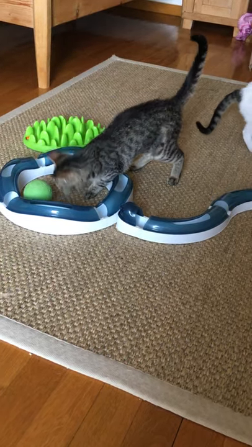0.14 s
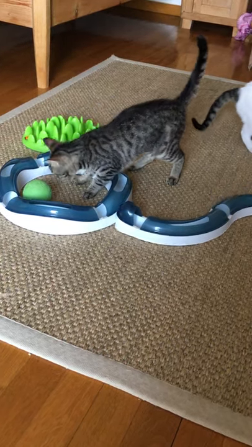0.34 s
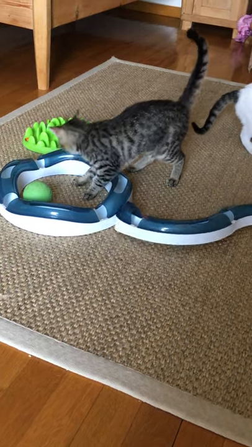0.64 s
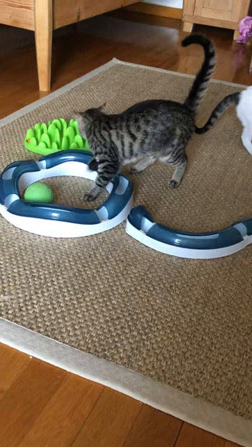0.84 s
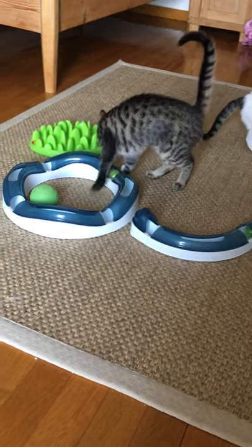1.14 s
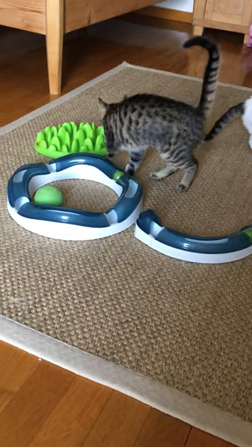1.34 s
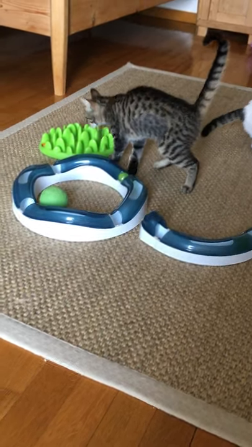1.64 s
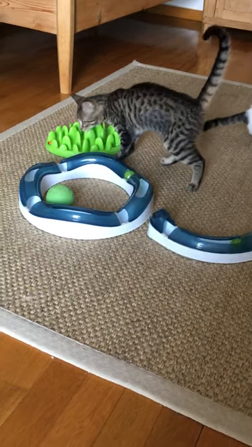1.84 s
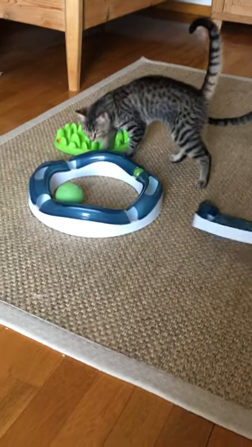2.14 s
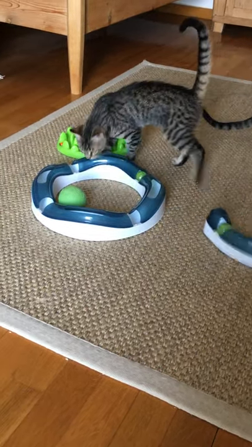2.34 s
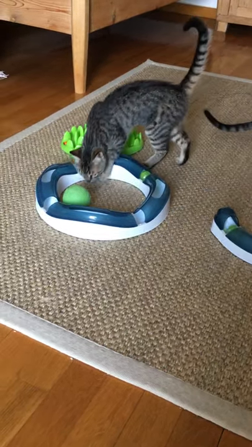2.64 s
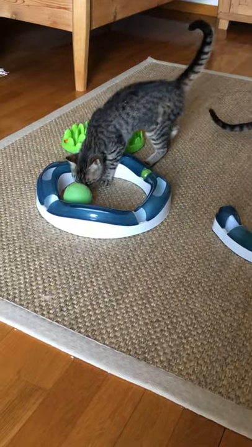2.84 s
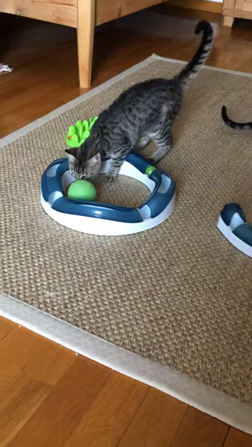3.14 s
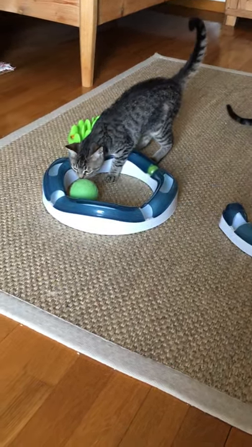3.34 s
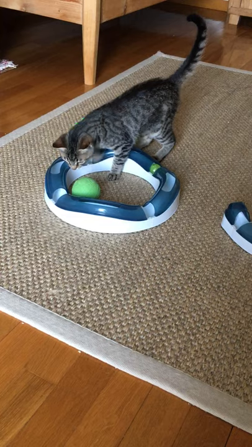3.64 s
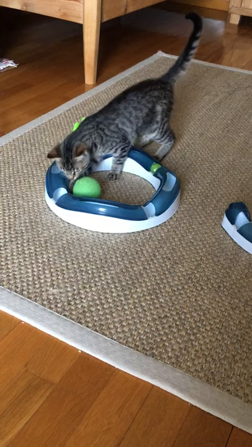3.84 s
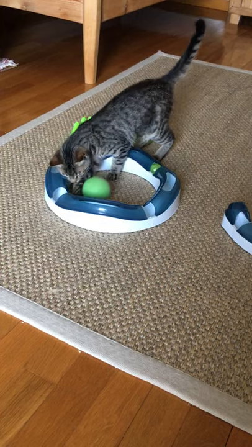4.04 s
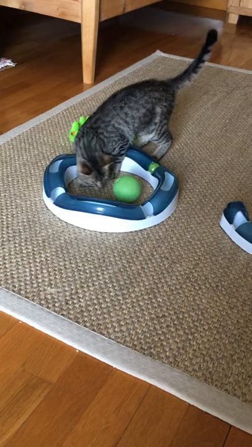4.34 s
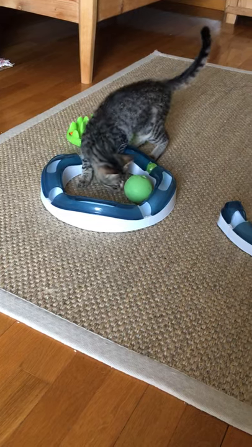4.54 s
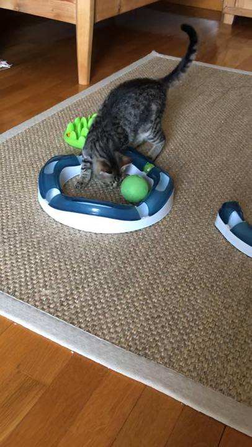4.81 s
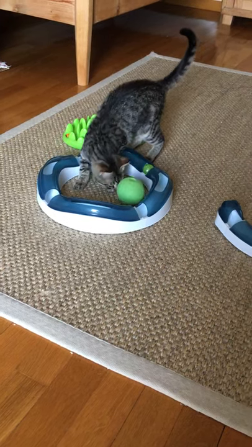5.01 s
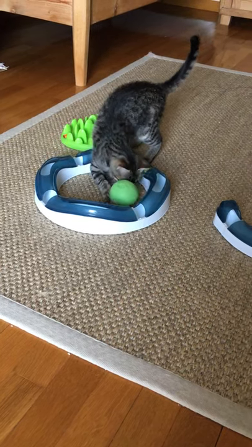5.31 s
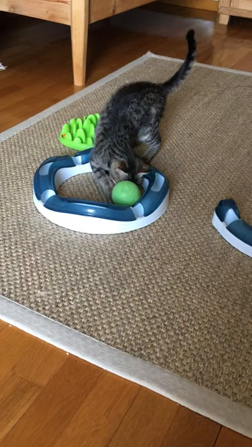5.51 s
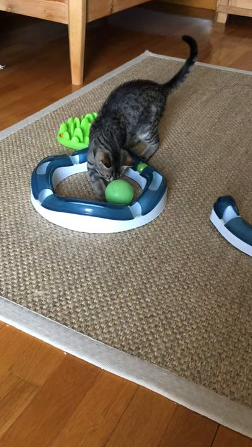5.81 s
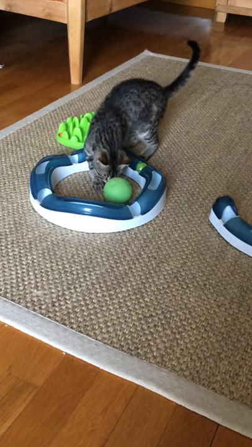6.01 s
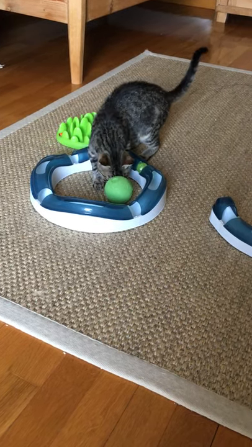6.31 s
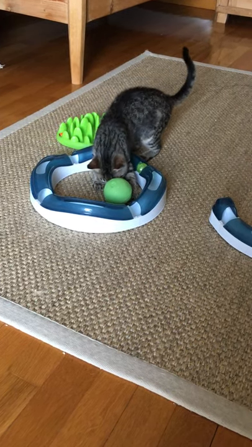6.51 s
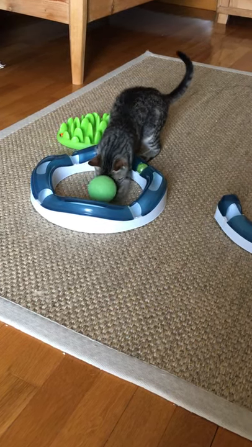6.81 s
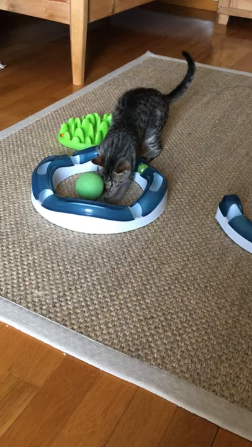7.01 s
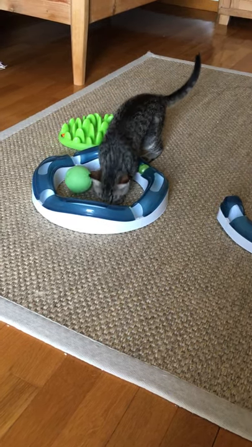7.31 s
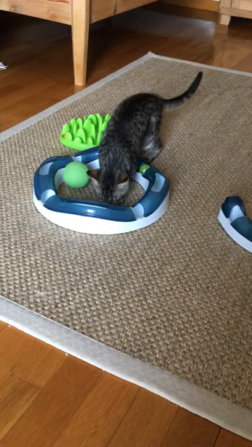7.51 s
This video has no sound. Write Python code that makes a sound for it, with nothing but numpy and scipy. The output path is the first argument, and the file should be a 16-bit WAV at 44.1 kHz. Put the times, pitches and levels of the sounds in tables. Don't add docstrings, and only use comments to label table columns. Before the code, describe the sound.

Thin plastic shells clack and dull hollow bases thud as paws strike toy tracks. Scraping and brushing over rug fibres accompany the early blows, including a strong crack near one second and the loudest clattering impact near two and a half. Faint taps follow, then a big hollow ball rolls softly and busy lighter knocks continue to the end, with short indoor reverberation and low hum.

```python
import sys
import numpy as np
from scipy import signal
from scipy.fft import rfft, irfft, next_fast_len
from scipy.io import wavfile
from scipy.ndimage import uniform_filter1d

SR = 44100
rng = np.random.default_rng(int(sys.argv[2]) if len(sys.argv) > 2 else 0)


def wav_out(sig):
    wavfile.write(sys.argv[1], SR, np.round(np.clip(np.atleast_2d(sig).T, -1, 1) * 32767).astype(np.int16))


def invert_db(level):
    return 10 ** (np.asarray(level, dtype=float) / 20)


N = 337785

# (frequency [Hz], density [dB per Hz])
HUM_COLOUR = [(15, -25), (25, -15), (64, 3.5), (97, 3.5), (206, -7.5), (335, -7.5), (439, -24.5),
              (677, -10), (936, -19), (1480, -19), (3430, -31.5), (12200, -35.5), (16000, -44)]
# (time [s], held [s], ball in track [dB], harshness as scrape re ball [dB])
SLIDES = [(0, 0.17, -55, -3.5), (.25, 0.17, -60.5, -0.5), (.53, 0.33, -61.5, 0.5), (.8, 0.13, -61.5, 3.5),
          (0.898, 0.058, -43.5, -7), (1.29, 0.017, -72.5, 10), (1.61, 0.16, -59.5, -1),
          (1.75, 0.024, -55, 8.5), (1.86, .22, -59, 1), (2.13, 0.056, -43, -3.5), (2.3, 0.35, -58, -1),
          (2.68, 0.055, -55, -5.5), (2.76, 0.031, -66.5, 4.5), (2.848, .75, -71, -16),
          (3.65, .6, -81.5, -2), (5.07, 0.16, -63, 1), (5.289, 0.14, -61, -17), (5.46, 0.11, -62.5, -2),
          (5.621, 0.028, -46, 0), (5.73, .11, -56.5, -9.5), (6.079, 0.06, -60, 4), (6.2, 0.021, -47, -11.5),
          (6.28, 0.064, -53, -7), (6.52, 0.026, -49.5, 8.5), (6.59, 0.031, -52.5, 7.5),
          (6.7, 0.086, -52.5, 5), (6.79, 0.039, -57, -23), (6.9, 0.3, -58, -9), (7.37, 0.028, -63, 1),
          (7.47, .2, -67.5, -6)]
# (frequency [Hz], width [Hz], level [dB])
TRACK_MODES = [(1150, 33, -1), (1350, 550, 19), (1650, 220, 16), (2000, 520, -13)]
# (frequency [Hz], density [dB per Hz])
SCRAPE_COLOUR = [(1800, -7), (2500, 1.5), (3200, -2), (4300, -8.5), (5500, -16)]
# (frequency [Hz], density [dB per Hz])
FIBRE_COLOUR = [(4500, -9.5), (6000, 4), (8000, -7.5), (12000, -7.5), (16000, -15)]
# (time [s], held [s], level [dB])
SHOVES = [(0, .04, -58.5), (.12, .75, -69), (.97, 0.15, -65), (1.521, .55, -63.5), (2.28, 0.32, -56.5),
          (2.5, 0.028, -43), (2.8, .7, -71.5), (4.618, 0.096, -62.5), (5.64, 0.18, -54),
          (6.15, 0.19, -56.5), (6.58, 0.62, -58.5), (6.97, 0.14, -57.5), (7.17, 0.31, -70.5),
          (7.62, .05, -62.5)]
# (frequency [Hz], width [Hz], level [dB])
BASE_MODES = [(151.6, 97, 6.5), (244, 36, 6), (350.5, 110, -11.5), (510, 88, -5.5), (694, 930, -4)]
# (delay [s], level [dB])
ECHOES = [
    (.009, -20),
    (.015, -11),
    (.026, -13.5),
    (.035, -10),
]
# (frequency [Hz], T60 [s], level [dB])
ROOM_TAIL = [(124.3, 0.053, -13), (370, 0.36, 11), (1000, 0.42, 2), (2170, 0.44, 4.5), (4300, 0.36, 3.5),
             (9300, 0.27, 4.5), (13050, 0.21, 0.5)]
# (time [s], wall ring [dB], ring pitch [Hz], weight as thud re ring [dB], hardness as clack re ring [dB])
BATS = [(0.04, -41.5, 1510, -14.5, -7.5), (0.116, -30.5, 1600, -25, -14.5), (0.272, -39, 1350, -17, -17),
        (0.359, -39, 1560, -16, -16), (0.48, -40, 1410, -15.5, -11.5), (0.89, -13.5, 1196, -22.5, -19),
        (1.287, -46, 1615, -45, -13), (1.567, -45.5, 1380, -31, -17), (1.622, -25.5, 1080, -17.5, -23.5),
        (1.649, -23.5, 1446, -15.5, -20.5), (1.696, -34.5, 1530, -11, 5.5), (1.708, -21.5, 1040, -22, -34),
        (1.795, -40.5, 1080, -11.5, -6), (1.833, -28.5, 1600, -40, -13), (1.889, -49, 1560, -32, -1.5),
        (1.943, -37, 1560, -37, -16), (2, -52.5, 1350, -19, 0), (2.102, -36.5, 1380, -10.5, -0.5),
        (2.169, -31.5, 1300, -43, -18), (2.297, -33, 1280, -13.5, -22.5), (2.589, -30, 1640, -30, -9),
        (2.749, -31, 1350, -19, -14)]
# (time [s], wall ring [dB], ring pitch [Hz])
TAPS = [(0.164, -65, 1560), (2.989, -50.5, 1255), (3.128, -53.5, 1148), (3.314, -53.5, 1264),
        (3.449, -53.5, 1460), (3.524, -56.5, 1280), (3.619, -57, 1940), (3.65, -49, 1530),
        (3.825, -56.5, 1226), (3.991, -51, 1126), (4.163, -61.5, 1376), (4.513, -58.5, 969),
        (4.582, -48.5, 1290), (4.78, -56.5, 934), (4.907, -53.5, 1214), (5.262, -55.5, 1550),
        (7.216, -55, 1520), (7.492, -61.5, 1350), (7.522, -54, 1960), (7.585, -50, 1330),
        (7.612, -42, 1370)]
# (time [s], level [dB], pitch [Hz])
PAWS = [
    (0.428, -58, 99),
    (0.63, -56, 210),
    (0.668, -56.5, 124),
    (1.66, -51, 310),
    (2.302, -49.5, 335),
    (2.344, -65, 333),
    (7.057, -47, 240),
    (7.615, -53, 200),
    (5.292, -46, 69),
    (5.979, -54.5, 267),
]
# (time [s], wall ring [dB], ring pitch [Hz], weight [dB], hardness [dB])
CRASH = [
    (2.43, -25, 1150, -6.5, -28.5),
    (2.441, -13.5, 1215, -38, -21.5),
    (2.443, -4, 1240, -19, -30.5),
    (2.45, -8, 1394, -36, -9),
    (2.453, -11, 1750, -10.5, -21),
    (2.46, -13.5, 2060, -44.5, -19),
]
# (time [s], wall ring [dB], ring pitch [Hz], weight [dB], hardness [dB])
SWATS = [(5.032, -32, 1720, -38.5, -1.5), (5.197, -48.5, 1140, -7, -6.5), (5.452, -49, 1450, -11.5, 1),
         (5.462, -32.5, 1550, -21.5, -2), (5.487, -44, 1420, -32, -2), (5.557, -37.5, 1460, -29, -8.5),
         (5.607, -35.5, 1320, -17, 2.5), (5.701, -36, 1150, -12, -23), (5.764, -34.5, 1350, -29, -5.5),
         (5.788, -26, 1440, -15.5, -23.5), (6.067, -26.5, 1340, -20, -7.5), (6.08, -29, 1505, -9, -47),
         (6.209, -32.5, 1570, -11.5, -19), (6.288, -23.5, 1280, -23, -13.5), (6.348, -40.5, 2070, -16, 7.5),
         (6.465, -35.5, 1600, -26, -9.5), (6.636, -34, 1800, -15, -5.5), (6.776, -27, 1360, -16.5, -9),
         (6.971, -41, 1602, -31, -12), (7.055, -36.5, 1440, -5, -26), (7.12, -36.5, 1140, -10.5, -16.5),
         (7.269, -38.5, 1380, -35, -7), (7.304, -45, 1340, -7.5, -7.5), (7.353, -39.5, 1195, -12.5, -11)]
# (frequency [Hz], T60 [s], level [dB])
THUD_MODES = [(124, 0.07, -6), (175.7, 0.054, -5.5), (245, 0.041, -0.5), (329, 0.024, 1.5),
              (442.7, 0.044, -5), (610, 0.016, 9), (825, 0.036, 4)]
# (contact tick [dB], loss of lowest base modes [dB per dB of softer blow])
FAR_TRACK = (-6, 0.19)
NEAR_TRACK = (-3.7, 0.1)
# (time [s], held [s], level [dB], share of its deepest mode [dB])
NUDGES = [
    (4.18, .09, -63.5, -12),
    (4.329, .1, -53.5, -25.5),
    (4.649, .1, -54, -3),
    (5.195, 0.017, -63.5, 1),
    (5.36, 0.033, -56.5, -14),
    (5.48, 0.024, -59, -11),
    (7.53, 0.0074, -58.5, -23),
    (7.615, 0.015, -56, -3),
]
# (frequency [Hz], width [Hz], level [dB])
BALL_MODES = [(400, 45, -4), (500, 40, -3), (570, 35, 0), (670, 60, -9), (900, 70, -17)]
# (frequency [Hz], width [Hz], level [dB])
DEEP_MODE = [(295, 30, 0)]

DECADES = np.log(1000)


def unit(x):
    return x / np.sqrt(np.mean(x ** 2))


def shape(x, gain):
    size = next_fast_len(len(x))
    hz = np.arange(size // 2 + 1) * SR / size + 1e-3
    return irfft(rfft(x, size) * gain(hz), size)[:len(x)]


def colour(x, points):
    hz, db = np.transpose(points)
    return shape(x, lambda f: invert_db(np.interp(np.log(f), np.log(hz), db, left=-60, right=-60)))


def body(x, modes):
    return shape(x, lambda f: sum(invert_db(db) / (1 + 1j * (f / hz - hz / f) * hz / w) for hz, w, db in modes))


def band(x, lo_hz, hi_hz):
    return signal.sosfilt(signal.butter(3, [lo_hz, hi_hz], "band", fs=SR, output="sos"), x)


def spells(start_s, held_s, db, rise_db_s, fall_db_s, rest_db):
    t = np.arange(0, N / SR + .002, .002)[:, None]
    rise = rise_db_s * np.maximum(start_s - t, 0)
    fall = fall_db_s * np.maximum(t - start_s - held_s, 0)
    power = np.sum(invert_db(2 * (db - rise - fall)), axis=1) + invert_db(2 * rest_db)
    return np.interp(np.arange(N) / SR, t[:, 0], 10 * np.log10(power))


def grit(rate, spread_db):
    on = rng.random(N) < rate / SR
    size_db = np.minimum(spread_db * rng.exponential(size=N), 9)
    return on * rng.standard_normal(N) * invert_db(size_db)


def hum():
    waver_db = 0.5 * unit(uniform_filter1d(rng.standard_normal(N), 3000))
    return invert_db(-68.5 + waver_db) * unit(colour(rng.standard_normal(N), HUM_COLOUR))


def rolling(track_db, scrape_db, fibre_db):
    drift = unit(uniform_filter1d(rng.standard_normal(N), 900))
    catch = invert_db(3.5 * np.clip(drift, -2, 1.2))
    contacts = catch * grit(450, 4.0)
    chatter = unit(band(body(contacts, TRACK_MODES), 630, 1500))
    scrape = unit(colour(contacts + 0.86 * catch * grit(3600, 2.6), SCRAPE_COLOUR))
    brush = unit(colour(0.13 * contacts + catch * grit(7200, 6.6), FIBRE_COLOUR))
    return invert_db(track_db - 6.0) * chatter + invert_db(scrape_db - 10.5) * scrape + invert_db(fibre_db - 10.5) * brush


def slides():
    start, held, track_db, harsh_db = np.transpose(SLIDES)

    def level(db):
        return spells(start, held, db, rise_db_s=400, fall_db_s=152.5, rest_db=-90)

    brush_db = track_db - 8 + 0.9 * harsh_db
    return rolling(level(track_db), level(track_db + harsh_db), level(brush_db))


def shoves():
    db = spells(*np.transpose(SHOVES), rise_db_s=93, fall_db_s=109, rest_db=-76.5)
    return invert_db(db - 11.5) * unit(band(body(grit(400, 9.0), BASE_MODES), 110, 900))


def room():
    t = np.arange(SR) / SR
    centres = np.log([hz for hz, _, _ in ROOM_TAIL])
    tail, early = 0, np.zeros(SR)
    for k, (_, t60, db) in enumerate(ROOM_TAIL):
        this_band = np.arange(len(ROOM_TAIL)) == k
        noise = shape(rng.standard_normal(SR), lambda f: np.interp(np.log(f), centres, this_band))
        tail = tail + invert_db(db) * noise * np.exp(-DECADES * t / t60)
    tail = tail * (1 - np.exp(-(t / 0.0043) ** 2))
    for k, (s, db) in enumerate(ECHOES):
        early[int(s * SR)] = (-1) ** k * invert_db(db)
    response = invert_db(-2) * tail / np.sqrt(np.sum(tail ** 2)) + band(early, 60, 3500)
    response[0] = 1
    return response


def ring(t, hz, db, t60, push_s, phase):
    swing = np.sin(2 * np.pi * (np.outer(hz, t) + phase[:, None]))
    decay = np.exp(-DECADES * np.outer(1 / t60, t))
    return invert_db(db) @ (swing * decay) * np.sin(np.pi / 2 * np.minimum(t / push_s, 1)) ** 2


def blow(t, wall_hz, clack_db, tick_db, chance):
    pair_hz = wall_hz * np.array([1, 1.17])
    wall = ring(t, pair_hz, np.array([-6, -7]), np.array([.015, .012]), .0012, .2 * chance[:2])
    hz = 950 * (16000 / 950) ** (((np.arange(60) + chance[2:62]) / 60) ** .75)
    bends = np.log([950, wall_hz * 1.2, 2700, 4200, 6500, 10000, 16000])
    clack_db, tick_db = clack_db - 1.5, tick_db - 9
    bend_db = [-22, -14, clack_db, clack_db - 9.0, tick_db, tick_db - 5.0, tick_db - 9.5]
    db = np.interp(np.log(hz), bends, bend_db)
    phase = np.cumsum(.5 - .3 * chance[62:])
    return wall + ring(t, hz, db, .011 * (3000 / hz) ** .15, .0006, phase)


def knocks():
    t = np.arange(8192) / SR
    short = t[:1200]
    base, shell = np.zeros(N + len(t)), np.zeros(N + len(t))
    thud = np.array([invert_db(db) * np.sin(2 * np.pi * hz * t) * np.exp(-DECADES * t / t60)
                     for hz, t60, db in THUD_MODES])
    thud = thud * (1 - np.exp(-t / 0.002))
    lowest = np.array(THUD_MODES)[:, 0] < 220
    taps = [(*tap, -12, -15.5) for tap in TAPS]
    blows = [(*row, *FAR_TRACK) for row in BATS + CRASH + taps]
    blows += [(*row, *NEAR_TRACK) for row in SWATS]
    for s, db, hz, thud_db, clack_db, tick_db, loss in blows:
        k = int((s + .0003) * SR)
        tick_db = tick_db + 1.1 * clack_db
        shell[k:k + len(short)] += invert_db(db + 4.5) * blow(short, hz, clack_db, tick_db, rng.random(122))
        swing = invert_db(lowest * loss * min(db + 9.5, 0))
        base[k:k + len(t)] += invert_db(db + thud_db - 0.5) * swing @ thud
    for s, db, hz in PAWS:
        k = int(s * SR)
        base[k:k + len(t)] += invert_db(db + 7.5) * np.sin(2 * np.pi * hz * t) * np.exp(-DECADES * t / 0.036)
    return (band(shell, 800, 15000) + band(base, 110, 700))[:N]


def weave(db, deep_db):
    pace = 30 * (1 + .35 * unit(uniform_filter1d(rng.standard_normal(N), 1500)))
    strands = np.cumsum(pace / SR)
    bumps = (.45 + np.sin(np.pi * strands) ** 4) * rng.standard_normal(N)
    shell = unit(band(body(bumps, BALL_MODES), 370, 740))
    deep = unit(body(body(bumps, DEEP_MODE), DEEP_MODE))
    return invert_db(db - 2.0) * (shell + invert_db(deep_db) * deep)


def big_ball():
    start, held, db, deep_db = np.transpose(NUDGES)

    def level(level_db):
        return spells(start, held, level_db, rise_db_s=189, fall_db_s=213, rest_db=-120)

    return weave(level(db), level(db + deep_db) - level(db))


def scene():
    ball = big_ball()
    toys = knocks() + slides() + shoves() + 0.19 * ball
    return (signal.fftconvolve(toys, room())[:N] + 0.38 * ball + hum())[None]


def low_pass(x):
    return signal.sosfilt(signal.butter(12, 16720, fs=SR, output="sos"), x)


def record(dry):
    mix = 1.023 * np.tanh(dry / 0.61)
    return low_pass(mix)


dry = scene()
out = record(dry)
wav_out(out)
```